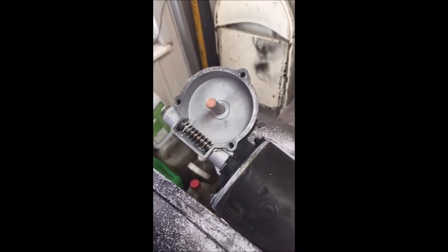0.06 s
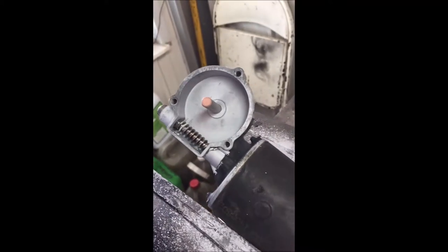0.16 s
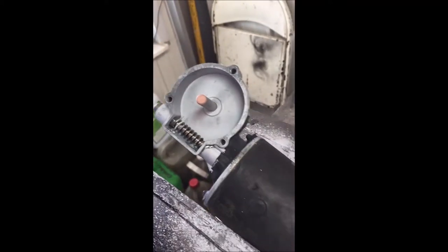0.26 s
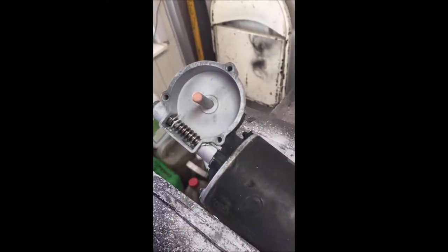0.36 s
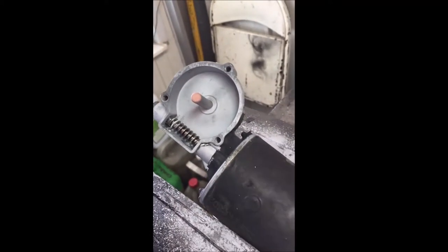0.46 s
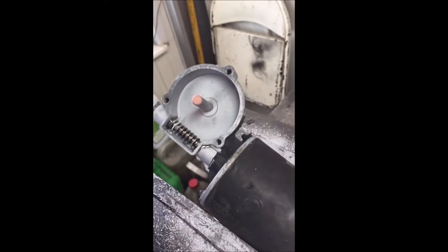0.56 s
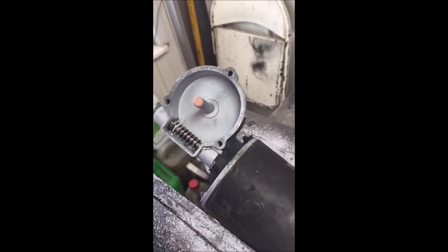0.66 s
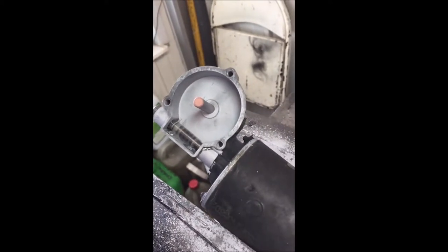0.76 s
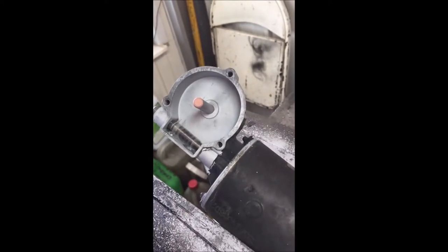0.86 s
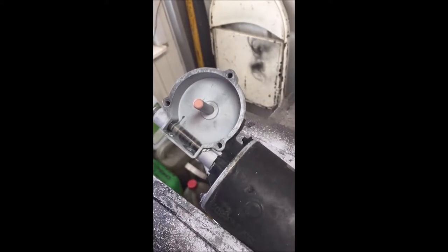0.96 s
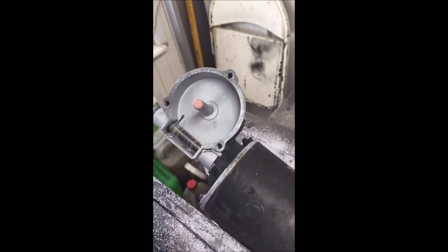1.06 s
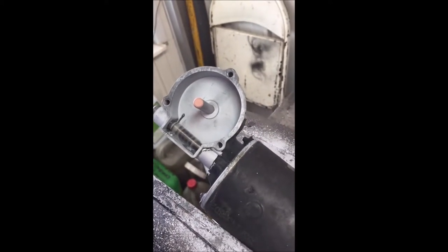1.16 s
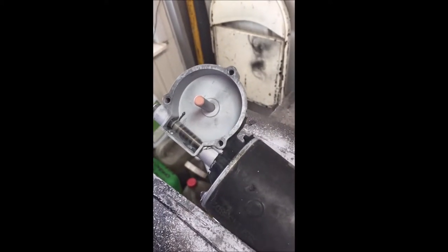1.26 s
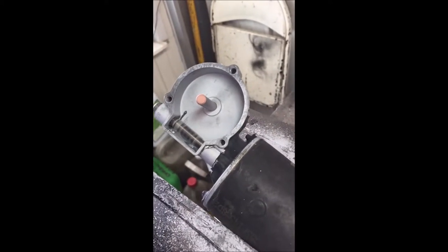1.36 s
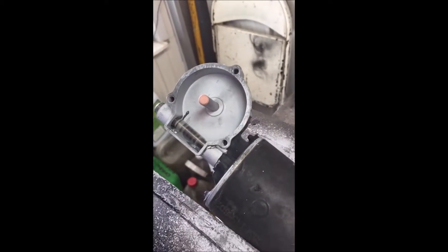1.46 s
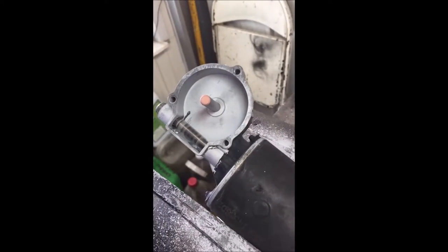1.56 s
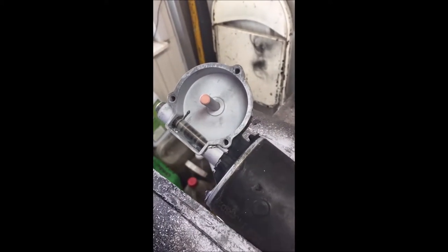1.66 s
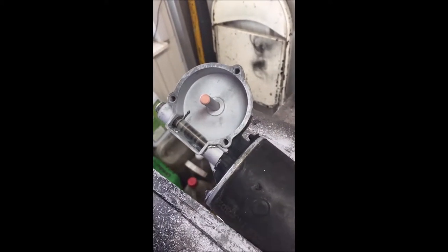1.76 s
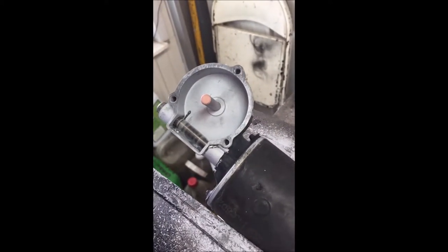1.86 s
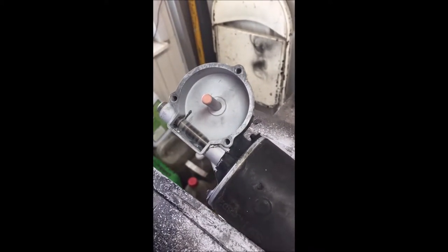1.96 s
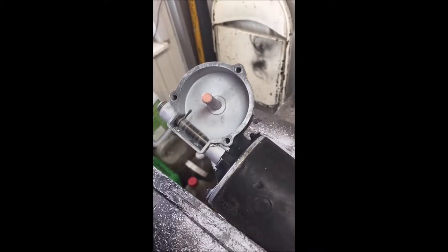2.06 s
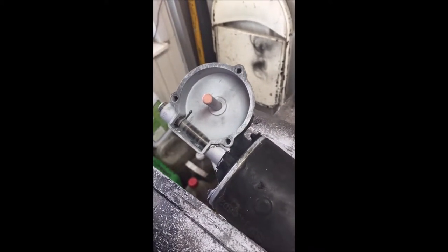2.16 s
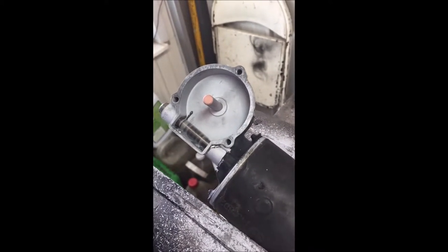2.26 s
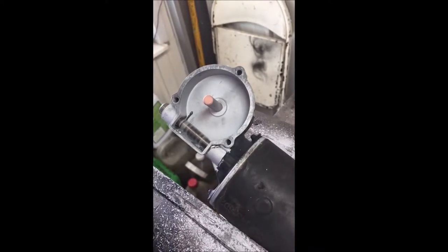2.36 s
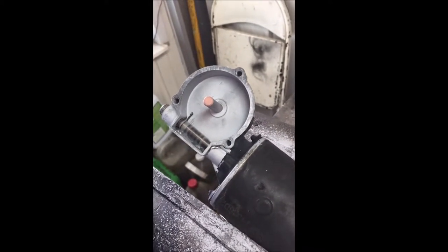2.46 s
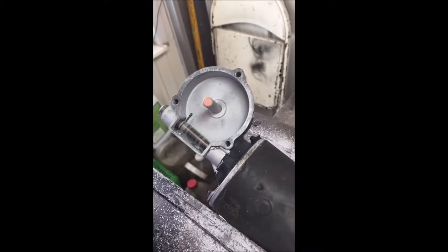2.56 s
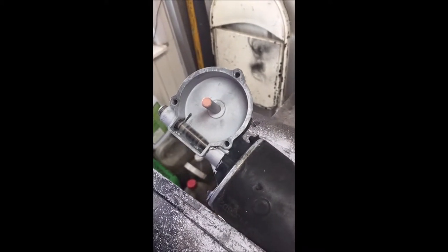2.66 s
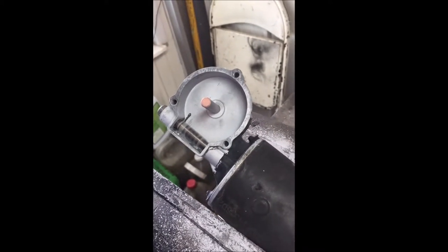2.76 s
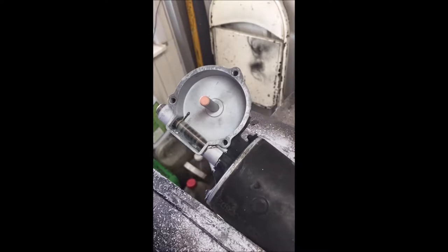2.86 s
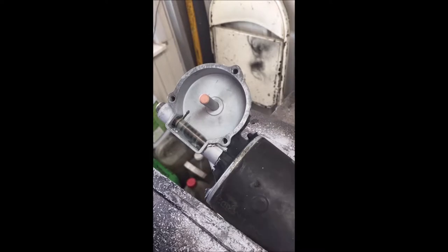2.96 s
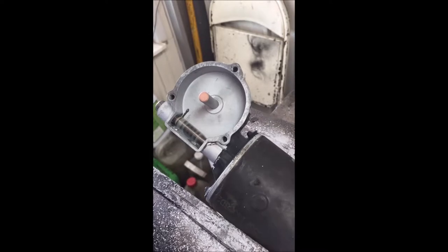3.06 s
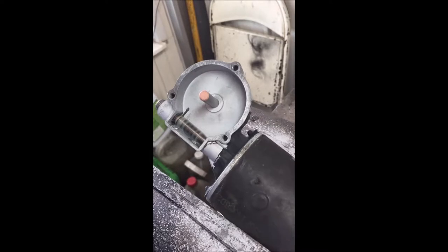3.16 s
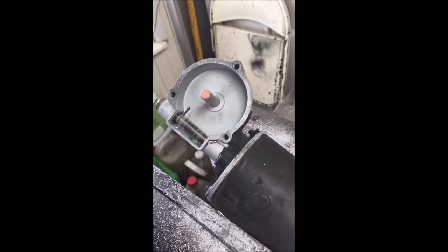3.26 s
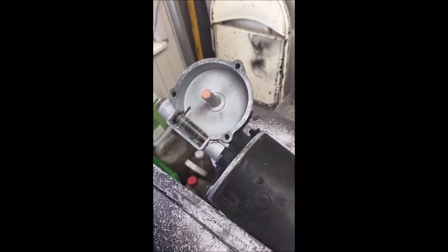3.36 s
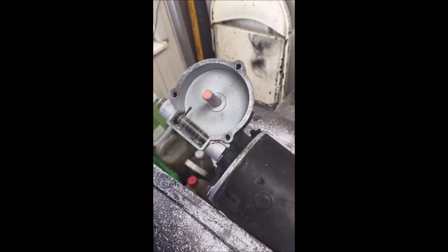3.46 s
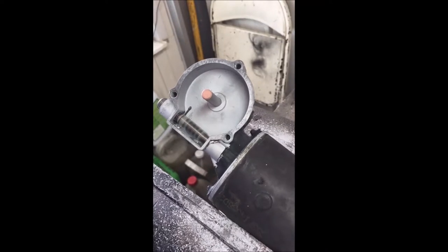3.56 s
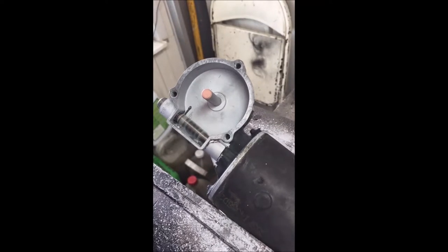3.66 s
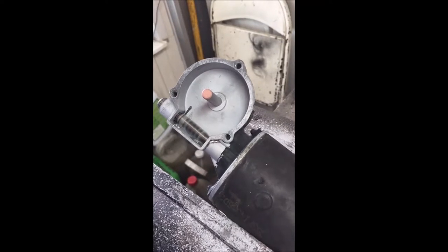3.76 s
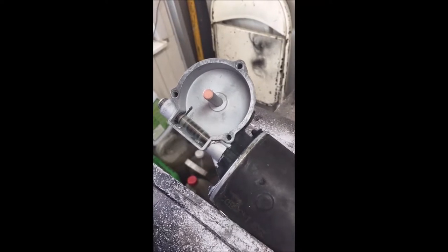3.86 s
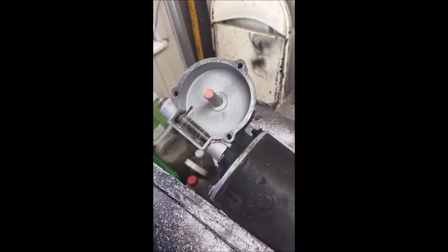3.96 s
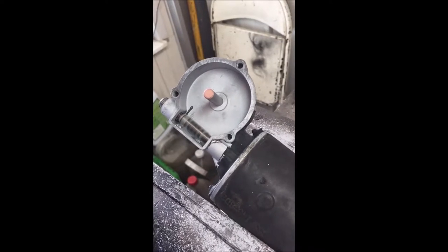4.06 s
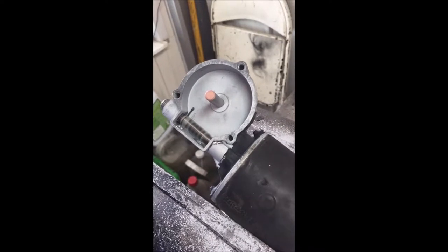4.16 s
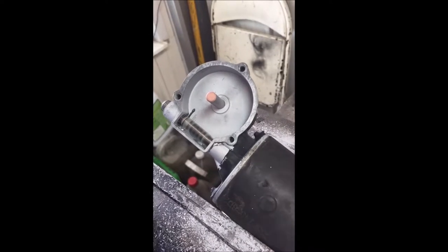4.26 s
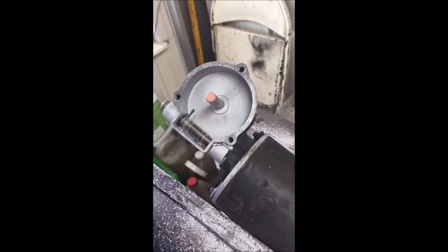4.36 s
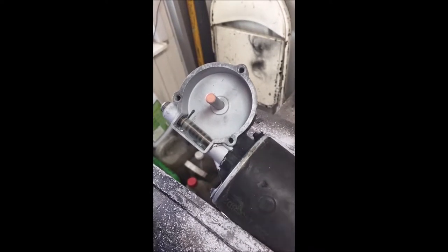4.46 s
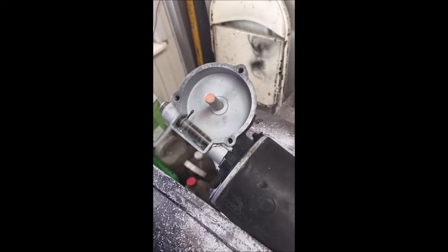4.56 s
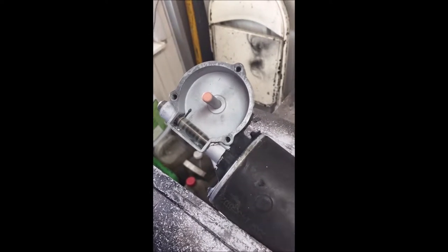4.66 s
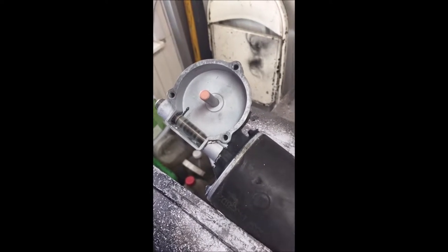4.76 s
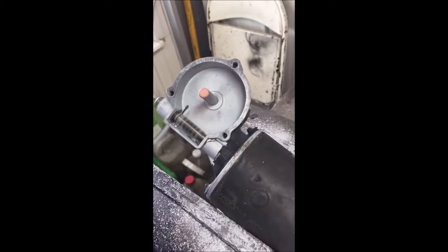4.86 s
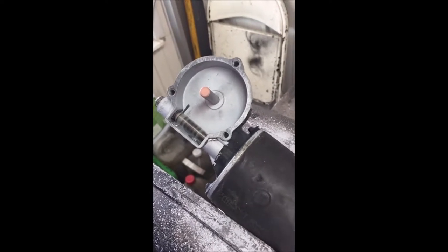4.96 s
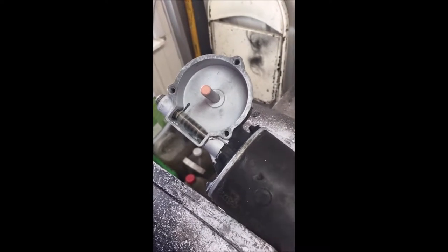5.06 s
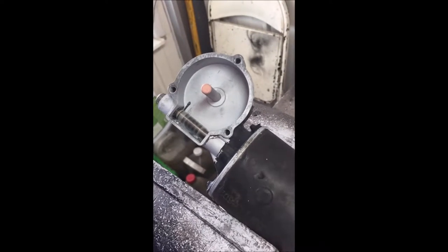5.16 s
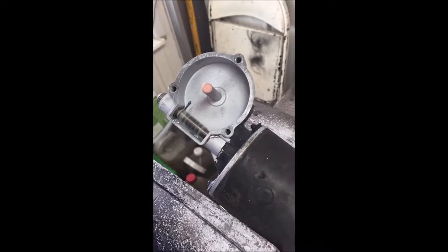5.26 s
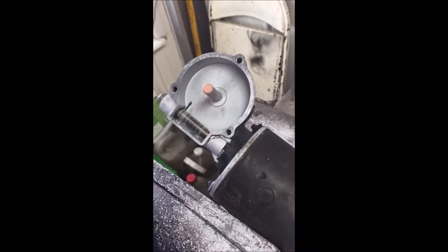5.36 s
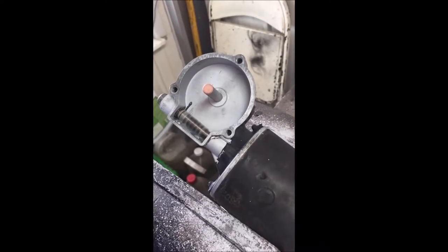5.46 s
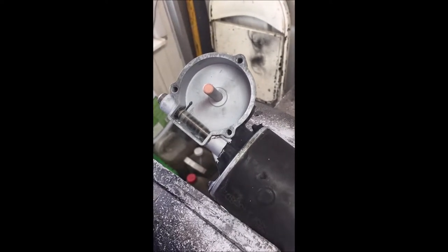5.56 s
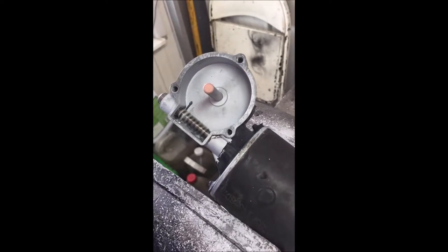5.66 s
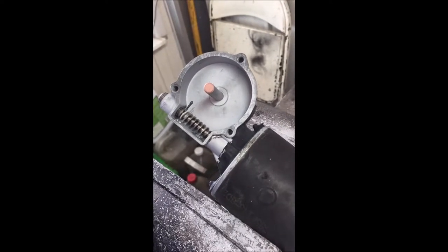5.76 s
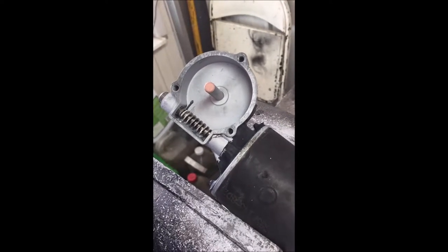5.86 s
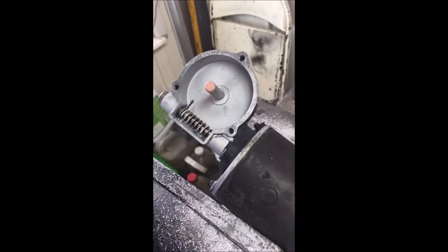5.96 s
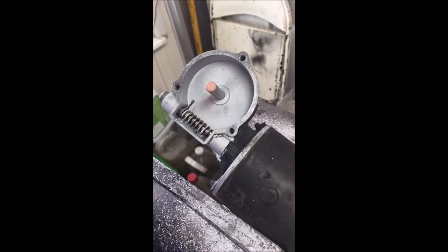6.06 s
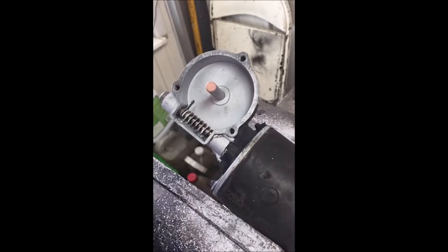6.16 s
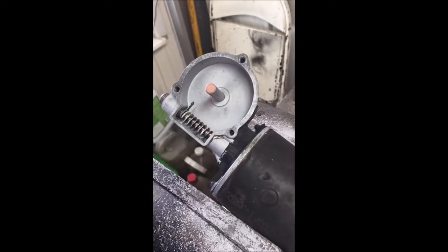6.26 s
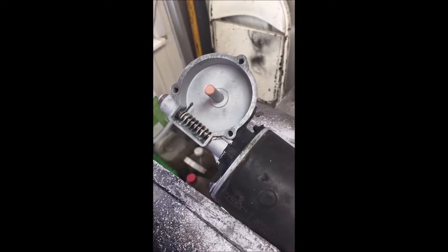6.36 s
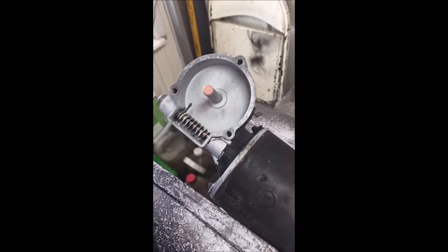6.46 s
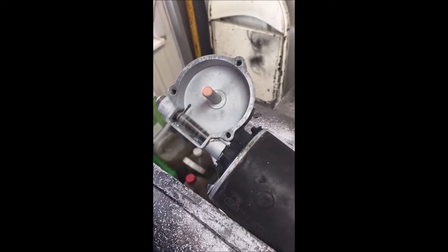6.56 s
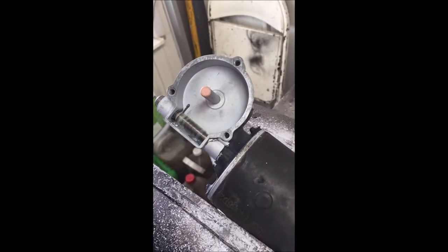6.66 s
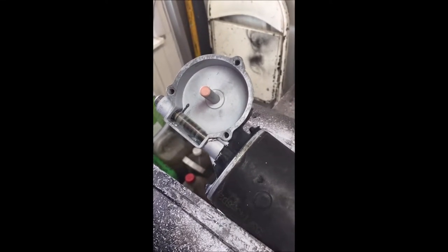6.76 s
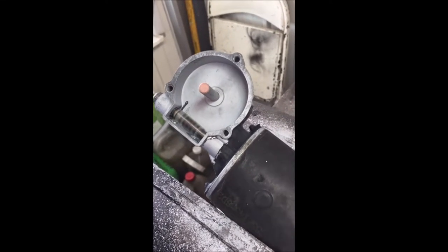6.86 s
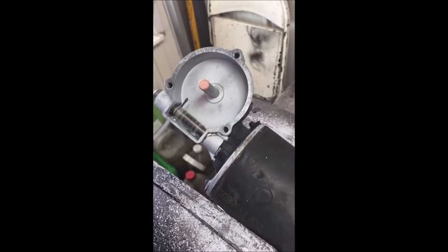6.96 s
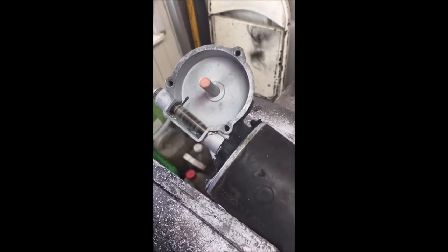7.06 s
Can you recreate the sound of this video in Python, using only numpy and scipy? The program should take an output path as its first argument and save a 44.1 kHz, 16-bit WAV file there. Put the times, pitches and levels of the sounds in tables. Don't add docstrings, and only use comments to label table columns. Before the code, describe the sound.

A sharp electric snap, then a small bare brushed motor spins up into a buzzy, sizzling whine, cuts out, squeaks to a stop, and restarts.

```python
import sys
import numpy as np
from scipy import signal
from scipy.fft import rfft, irfft
from scipy.io import wavfile
from scipy.ndimage import uniform_filter1d

SR = 44100
rng = np.random.default_rng(int(sys.argv[2]) if len(sys.argv) > 2 else 0)


def file_out(sig):
    cols = np.atleast_2d(sig).T
    lim = np.clip(cols, -1, 1)
    pcm = np.round(lim * 32767).astype(np.int16)
    wavfile.write(sys.argv[1], SR, pcm)


def how_loud(loudness_db):
    steps = np.asarray(loudness_db, float) / 20
    return 10 ** steps


N = 313110
TIME = np.arange(N) / SR
ON_S, OFF_S, AGAIN_S = .872, 5.516, 6.668
CATCH_S, SQUEAK_S = 5.89, 5.791
FULL_HZ = 83.5
BARS = 10


def curve(rows, column):
    rows = np.array(rows, float)
    return np.interp(TIME, rows[:, 0], rows[:, column])


def shape(table, hz):
    table = np.array(table, float)
    return np.interp(np.log(np.maximum(hz, 1)), np.log(table[:, 0]), table[:, 1])


def rings(peaks, hz):
    return np.sqrt(sum(how_loud(db) ** 2 / (1 + (2 * (hz - f) / w) ** 2) for f, w, db in peaks))


def colour(x, gain):
    cepstrum = irfft(np.log(gain(np.fft.rfftfreq(4096, 1 / SR)) + 1e-6))
    cepstrum[1:2048] *= 2
    cepstrum[2049:] = 0
    response = irfft(np.exp(rfft(cepstrum)))
    return signal.fftconvolve(x, response)[:len(x)]


def unit(x):
    return x / np.sqrt(np.mean(x ** 2))


def drift(size, steps):
    x = rng.standard_normal(size)
    for _ in range(2):
        x = uniform_filter1d(x, int(steps), axis=0)
    return unit(x)


def coasting_gate():
    return uniform_filter1d(1. * ((TIME > OFF_S) & (TIME < AGAIN_S)), size=900)


# frequency in Hz, gain in dB.
REVERSED_TILT = [(400, 6.5), (2900, 1.5), (5000, -6.5), (7500, 7), (10000, -1.5), (12500, -6.5),
                 (14500, -4)]


def motor():
    hz, angle = shaft()
    sound = magnets(hz, angle) + brushes(hz, angle)
    backwards = colour(sound, lambda f: how_loud(shape(REVERSED_TILT, f)))
    spectrum = rfft(np.where(TIME < AGAIN_S, sound, backwards))
    f = np.fft.rfftfreq(N, 1 / SR)
    low = 1 / (1 + (f / 1500) ** 8)
    high = 1 / (1 + (5600 / np.maximum(f, 1)) ** 16)
    regions = [irfft(spectrum * share, N) for share in (low, 1 - low - high, high)]
    steady = (TIME > 1.5) & (TIME < OFF_S)
    out = sum(part / part[steady].std() * how_loud(db) for part, db in zip(regions, loudness(hz)))
    shake_level = np.sqrt(2) * how_loud(-62 + 0.8 * drift(N, 4000))
    near_full = np.clip((hz - 70.6) / 9, 0, 1) ** 2
    out += shake_level * near_full * np.sin(2 * np.pi * angle)
    edges_s = [ON_S, ON_S + 0.025, CATCH_S - .05, CATCH_S, AGAIN_S, AGAIN_S + 0.018]
    return out * np.interp(TIME, edges_s, [0, 1, 1, 0, 0, 1])


# time in seconds, turns per second in Hz.
FREE_SPEED = [(1.95, 83.8), (2.76, 84.5), (3.1, 83.8), (3.6, 83.8), (3.96, 84.4), (4.18, 84.2),
              (4.74, 82.7), (5.33, 82.9), (5.49, 83.4)]
# gap in Hz, time constant in seconds.
SPIN_UP = [(38.14, .07), (24.94, .2)]


def shaft():
    drag_s, rub_hz = .5, 55.4
    backwards_gain_hz = 1.6
    since = np.maximum(TIME - np.where(TIME < AGAIN_S, ON_S, AGAIN_S), 0)
    free = curve(FREE_SPEED, 1) + backwards_gain_hz * (TIME > AGAIN_S - .01)
    powered = free - sum(gap * np.exp(-since / tau) for gap, tau in SPIN_UP)
    coast = (free + rub_hz) * np.exp(-np.abs(TIME - OFF_S) / drag_s) - rub_hz
    unpowered = (TIME > OFF_S) & (TIME < AGAIN_S - .01)
    hz = np.where(unpowered, np.maximum(coast, 2), powered)
    hz = uniform_filter1d(hz, size=400, mode="nearest") * (1 + .0006 * drift(N, 900))
    return hz, np.cumsum(hz) / SR


MULTIPLES = [4, 5, 7, 8, 10, 11, 12, 13, 14, 15, 18, 20, 21, 22, 23, 25, 30, 31, 39, 40, 47, 48, 49, 50, 51,
             52, 58, 59, 60, 61]
STAGE_S = [1.8, 5.0, 6.0]
# level in dB early, in dB late, in dB reversed.
TONE_LEVELS = [(-32, -27, -31.5), (-23.5, -21, -24.5), (-29, -23.5, -14.5), (-26.5, -21, -17),
               (-10, -14.5, -11), (-26.5, -21, -24), (-40.5, -22.5, -26.5), (-41.5, -22, -26),
               (-28, -22.5, -37), (-28.5, -21.5, -27), (-34.5, -25.5, -26), (-24, -28, -16),
               (-16, -17, -18), (-19, -16.5, -28), (-18.5, -16, -15), (-12.5, -14.5, -20), (-19, -19, -23),
               (-15, -14.5, -14.5), (-19, -16.5, -16.5), (-28.5, -6, -12), (-12.5, -29.5, -29),
               (-10.5, -19, -17), (-13, -20, -37), (-12, -17.5, -27), (-16, -3, -17), (-10.5, -17.5, -27),
               (-10, -13.5, -40), (-12, -6, -3.5), (-8, -17, -16), (-13, -6.5, -13.5)]


def magnets(hz, angle):
    s, speed = TIME[::64], hz[::64]
    collapse = how_loud(-24) + np.exp(-np.abs(s - OFF_S) / .012)
    current = np.where((s > OFF_S) & (s < AGAIN_S), collapse, 1).clip(0, 1)
    slack = np.clip(1 - speed / FULL_HZ, 0, 1)
    size = (len(s), len(MULTIPLES))
    sway, flutter = drift(size, 250).T, drift(size, 10).T
    starts = rng.random(len(MULTIPLES))
    bar_fade = {BARS: 0, 2 * BARS: -.35, 3 * BARS: .3}
    out = np.zeros(N)
    for k, stage_db, slow, quick, start in zip(MULTIPLES, TONE_LEVELS, sway, flutter, starts):
        calm = .3 if k == BARS else 1
        db = np.interp(s, STAGE_S, stage_db) + (1.2 * slow + 1.08 * quick) * calm + 9 * slack * quick
        db -= slack * k * bar_fade.get(k, 1.6) + 45 * slack ** 2
        if k == 3 * BARS:
            db += (80 * slack - 300 * slack ** 2) * (s < OFF_S)
        gain = how_loud(db) * current * body(k * speed) / body(k * FULL_HZ)
        shake = (.02 * min(k / 30, 1) + .5 * slack) * np.roll(quick, 500)
        turns = k * angle + start + np.interp(TIME, s, shake)
        out += np.interp(TIME, s, gain) * np.sin(2 * np.pi * turns)
    return np.sqrt(2) * out


# frequency in Hz, width in Hz, level in dB.
LOOSE_BEARINGS = [(450, 69, -1.5), (674, 290, -9), (2160, 190, -9), (2994, 100, 3.5), (3587, 430, -4.5),
                  (4350, 570, 1), (4460, 440, -3)]


def brushes(hz, angle):
    pace = np.clip(hz / FULL_HZ, .05, 1)
    coasting = coasting_gate()
    strain = (1 - pace) * (1 - coasting)
    blur = SR * (2e-6 + 1e-4 * strain + 4e-4 * coasting)
    edges = unit(ticks(angle, count=BARS, uneven=.11, spread_db=2.5, wear=.018, throb_db=3, blur=blur))
    spots = unit(ticks(angle, count=37, uneven=.3, spread_db=4, wear=.05, throb_db=3, blur=blur))
    bars = unit(ticks(angle, count=BARS, uneven=.02, spread_db=3, wear=.01, throb_db=2, blur=0 * blur))
    rub_db = -8.5 + 3 * np.cos(4 * np.pi * angle) + 23.8 * strain
    rub = rng.standard_normal(N) * how_loud(rub_db)
    clicks = (edges + how_loud(5.0) * spots * pace ** 0.52) / np.sqrt(pace)
    source = colour(clicks, lambda f: f ** 2 / (f ** 2 + 1300 ** 2))
    source += colour(rub, lambda f: f / np.hypot(f, 1700))
    driven = unit(colour(source, body))
    knocks = colour(bars / np.sqrt(pace), lambda f: f ** 4 / (f ** 4 + 2800 ** 4))
    knocks = knocks + how_loud(-4) * edges + pace * (how_loud(-6) * spots + how_loud(3) * rub)
    slap = coasting * how_loud(2.6 * np.cos(2 * np.pi * angle + 1.55)) * knocks
    loose = colour(slap, lambda f: rings(LOOSE_BEARINGS, f) ** 1.28 * dips(f) ** 2)
    return driven * how_loud(-5 * coasting) + how_loud(-1.5) * loose / loose[coasting > .5].std()


def ticks(angle, count, uneven, spread_db, wear, throb_db, blur):
    turns = int(90 * N / SR)
    place = np.arange(count) + uneven * rng.standard_normal(count) + wear * drift((turns, count), 53)
    size_db = spread_db * (rng.uniform(-0.9, 0.85, count) + 0.82 * drift((turns, count), 80))
    size_db = size_db + throb_db * np.cos(4 * np.pi * place / count)
    click_angle = (np.arange(turns)[:, None] + place / count).ravel()
    at = np.interp(click_angle, angle, np.arange(N), right=N + 99)
    at = at + np.interp(at, np.arange(N), blur) * rng.standard_normal(len(at))
    taps = np.floor(at).astype(int)[:, None] + np.arange(-7, 9)
    lag = taps - at[:, None]
    weights = how_loud(size_db).ravel()[:, None] * np.sinc(lag) * np.cos(np.pi * lag / 16) ** 2
    return np.bincount(np.clip(taps, 0, N).ravel(), weights.ravel(), N + 1)[:N]


# frequency in Hz, level in dB per Hz.
HOUSING = [(250, -28.5), (450, -13.5), (900, -14), (1450, -13), (2200, -11.5), (3050, -12), (4200, -9.5),
           (5100, -9.5), (5600, -6.5), (6800, -11.5), (7900, -16), (9200, -13.5), (10400, -12.5),
           (11700, -7.5), (15500, -14.5)]
# frequency in Hz, width in Hz, lift in dB.
CASE = [(400, 48, 1), (734, 262, 14), (2040, 200, 11), (3050, 143, 11.5), (3780, 370, 6), (4180, 92, 7.5),
        (4790, 396, 8.5), (9090, 510, 6), (10496, 460, 10.5), (11270, 140, 7.5), (12770, 79, 11),
        (12600, 93, -21.5)]


def body(hz):
    return how_loud(shape(HOUSING, hz)) * (1 + rings(CASE, hz)) * dips(hz)


# frequency in Hz, width in Hz, depth from 0 to 1.
BENCH_NOTCHES = [(5580, 260, .9), (7950, 450, .7), (10400, 450, .85), (13050, 300, .6)]


def dips(hz):
    return np.prod([1 - depth / (1 + (2 * (hz - f) / w) ** 2) for f, w, depth in BENCH_NOTCHES], axis=0)


# time in seconds, level change in dB.
PHONE_DISTANCE = [(1.3, 0), (2.25, 0), (3.1, -1.53), (3.9, -3), (4.3, -3), (4.9, -5.5), (5.3, -5),
                  (5.5, -3.5)]
# level in dB at full speed, dB per slack, dB per slack squared,
# share of the distance loss from 0 to 1, change in dB when reversed.
POWERED = [
    (-50, 3.5, -2, 0.57, -4.5),
    (-44, 19.5, -52.5, 0.86, -0.5),
    (-47.5, -4.5, -33, .9, -6),
]
# level in dB, dB per slack squared.
COASTING = [
    (-50.5, -30),
    (-52.5, -18),
    (-46.5, -39),
]


def loudness(hz):
    slack = np.clip(1 - hz / FULL_HZ, 0, 1)
    off = coasting_gate()
    distance_db = curve(PHONE_DISTANCE, 1)
    jolt_db = 5 * np.exp(-((TIME - SQUEAK_S - .008) / .014) ** 2)
    levels = []
    for (db, a, b, share, back_db), (coast_db, c) in zip(POWERED, COASTING):
        powered = db + a * slack + b * slack ** 2 + share * distance_db + back_db * (TIME > AGAIN_S)
        coasting = coast_db + c * slack ** 2 + jolt_db
        levels.append((1 - off) * powered + off * coasting)
    return levels


# start in seconds, peak in dB, brightness in dB, tail in dB, tail decay in seconds.
SNAPS = [
    (.8662, -46, -25, -6, .004),
    (.8683, -42, -6, -4, .003),
    (.8797, -13, 5, -18, .007),
    (5.5153, -26, 3, -22, .002),
    (6.667, -44, 0, -6, .002),
    (6.6685, -33, -1, -10, .003),
]
CLIP_MODES = [(974, -16.5, 1.8), (4160, -15.5, 5.0), (5400, -34.5, 0.054), (6970, -15, 0.3), (6850, 4, 0.1),
              (9250, 2.5, 0.072), (12300, -23, 0.1), (14000, -20.5, 5.0)]
# frequency in Hz, level in dB, t60 in seconds.
SQUEAK = [(3020, -46, 0.056), (2230, -60, 0.06)]


def snaps():
    out, t = np.zeros(N), np.arange(4000) / SR

    def mode(f, db, t60):
        return how_loud(db) * np.exp(-np.log(1000) * t / t60) * np.sin(2 * np.pi * f * t)

    ring = sum(mode(f, db, min(t60, .012)) for f, db, t60 in CLIP_MODES)
    for s, db, bright_db, tail_db, tail_s in SNAPS:
        crack = rng.standard_normal(len(t)) * how_loud(tail_db) * np.exp(-t / tail_s)
        crack[:5] += [.6, 1, -1, -.8, .5]
        tilt = [(300, 8.2), (2500, 7.6), (9000, bright_db), (15000, bright_db)]
        hit = colour(crack + how_loud(-23.5) * ring, lambda f: how_loud(shape(tilt, f)))
        out[int(s * SR):][:len(t)] += how_loud(db) * hit / np.abs(hit).max()
    squeak = sum(mode(*row) for row in SQUEAK)
    out[int(SQUEAK_S * SR):][:len(t)] += squeak * (1 - np.exp(-t / 0.0011))
    return out


# time in seconds, pitch in Hz, level in dB.
ENGINE = [(0, 58.4, -75), (.5, 53.9, -70), (1.1, 49.7, -64), (1.68, 49, -59), (1.82, 45.4, -66),
          (2.4, 46.1, -70), (2.8, 49.2, -65), (3.24, 45.5, -60), (3.7, 51, -67), (4.2, 53.8, -63),
          (4.41, 53.4, -61.5), (5.5, 56.4, -63.5), (6.3, 55.4, -61.5), (7.1, 56.6, -63.5)]


def engine():
    lope_hz, peak_s = 2.15, 4.41
    depth = 0.63 * np.clip((TIME - peak_s + 0.55) / 0.26, 0, 1)
    lope = depth * np.cos(2 * np.pi * lope_hz * (TIME - peak_s))
    level = how_loud(curve(ENGINE, 2) + 1.5 * drift(N, 2500) * (TIME < peak_s))
    hum = level * (1 + lope) * np.sin(2 * np.pi * np.cumsum(curve(ENGINE, 1)) / SR)
    rumble = unit(colour(rng.standard_normal(N), lambda f: rings([(58, 33, 0)], f) ** 2))
    return np.sqrt(2) * hum + how_loud(-74.0) * rumble


# frequency in Hz, width in Hz, level in dB.
CLINK = [(755, 28, 3.5), (1025, 30, 3.5), (1240, 56, 2), (1560, 55, -5.5), (3310, 61, -4.5),
         (4320, 140, -4), (4600, 23, -2), (6460, 160, -8)]


def clink():
    ring = unit(colour(rng.standard_normal(N), lambda f: rings(CLINK, f)))
    return ring * how_loud(-67.5 - 60 * TIME / 1.27)


# frequency in Hz, level in dB per Hz.
AIR = [(53, -40), (90, -6.5), (119, -11.5), (162, -16), (303, -15.5), (419, -24.5), (647, -23),
       (3150, -31.5), (16000, -44)]
# frequency in Hz, level in dB.
MAINS_LINES = [(112, -80), (210, -85.5), (905, -88.5)]


def shed():
    air = unit(colour(rng.standard_normal(N), lambda f: how_loud(shape(AIR, f))))
    swell_db = np.interp(TIME, [0, .8, 5.9, 7.1], [0.3, 0.24, 0.91, 0.12]) + 1.4 * drift(N, 6000)
    lines = sum(how_loud(db) * np.sin(2 * np.pi * f * TIME) for f, db in MAINS_LINES)
    return air * how_loud(-72 + swell_db) + np.sqrt(2) * lines


def scene():
    return (motor() + snaps() + engine() + clink() + shed())[None]


# centre in seconds, depth in dB under the strongest beyond which bands
THIN_MOMENTS = [(.023, 9), (.128, 17), (1.004, 11), (2.177, 7.5), (2.968, 8.5), (3.01, 5.5), (3.566, 7),
                (3.574, 8.5), (3.584, 8.5), (3.991, 8), (4.032, 7.5), (4.139, 7), (4.182, 8.5), (4.29, 6.5),
                (4.331, 8), (5.398, 8.5), (6.06, 17), (6.423, 24), (6.722, 21)]


def thin_out(x):
    size = 1882
    out = x.copy()
    window = np.sin(np.pi * (np.arange(size) + .5) / size)
    favour = [(100, 4), (450, 6), (1500, 3), (4500, -2), (7000, 8), (12000, 5), (16000, -2)]  # Hz, dB
    tilt = how_loud(shape(favour, np.fft.rfftfreq(size, 1 / SR)))
    for s, keep_db in THIN_MOMENTS:
        frame = out[0, int(s * SR) - size // 2:][:size]
        bins = rfft(frame * window)
        band = np.sqrt(uniform_filter1d(np.abs(bins * tilt) ** 2, size=5))
        masker = np.sqrt(band.max() * 2 * uniform_filter1d(band, size=70))
        lost = 1 / (1 + (band / masker * how_loud(keep_db)) ** 12)
        kept = (1 - lost) * how_loud(1.5)
        frame -= window ** 3 * irfft(bins * (1 - kept), size)
    return out


def top_cut(x):
    return signal.sosfilt(signal.butter(12, 17040, fs=SR, output="sos"), x)


def record(dry):
    treble_cut = signal.ellip(10, .3, 55, 15680, fs=SR, output="sos")
    mix = thin_out(signal.sosfilt(treble_cut, dry))
    return top_cut(mix)


dry = scene()
out = record(dry)
file_out(out)
```